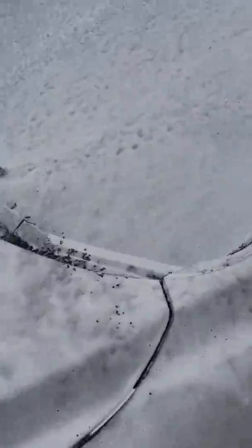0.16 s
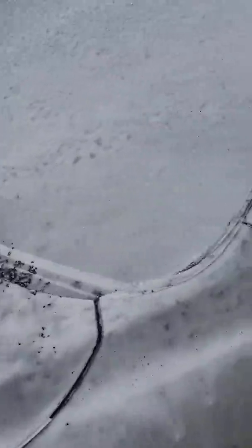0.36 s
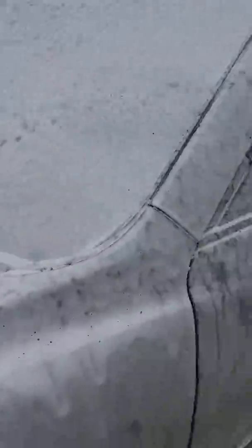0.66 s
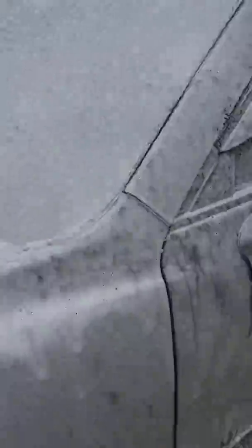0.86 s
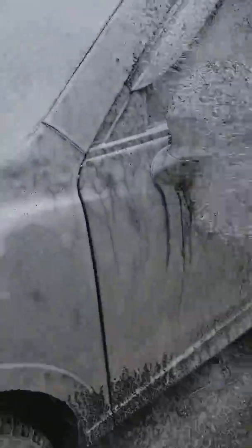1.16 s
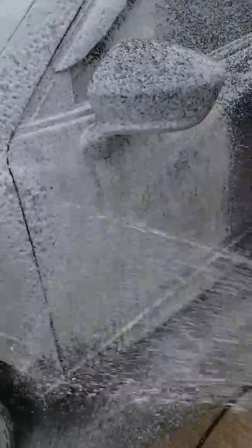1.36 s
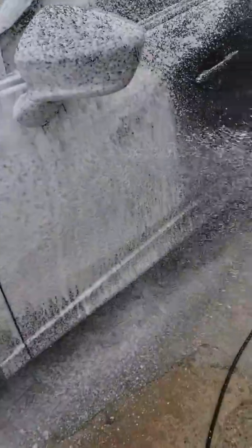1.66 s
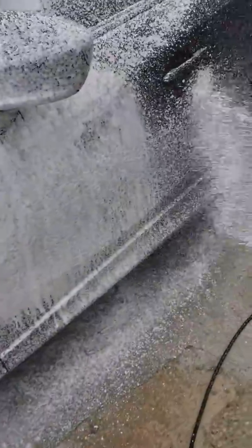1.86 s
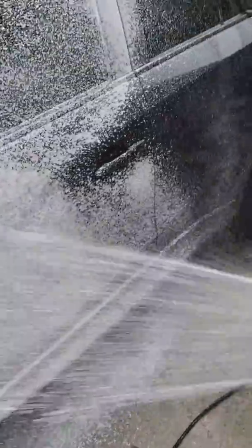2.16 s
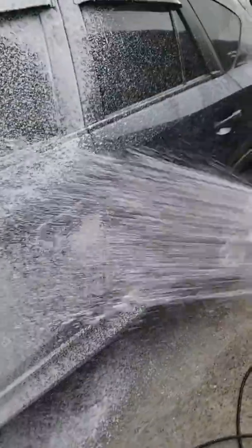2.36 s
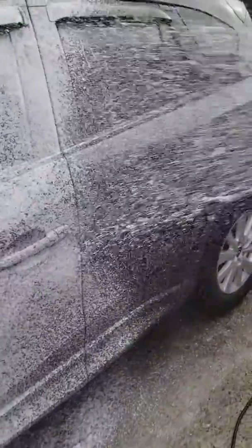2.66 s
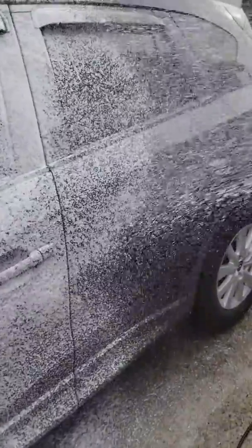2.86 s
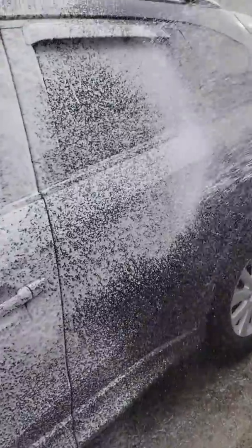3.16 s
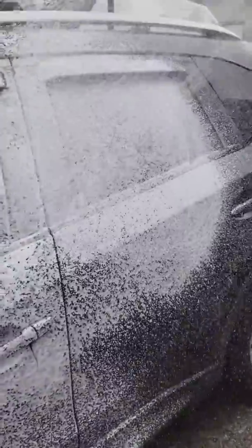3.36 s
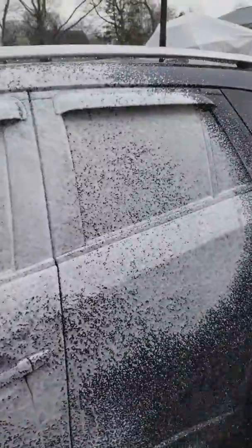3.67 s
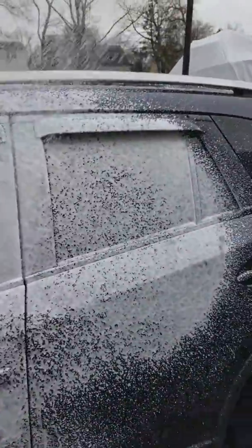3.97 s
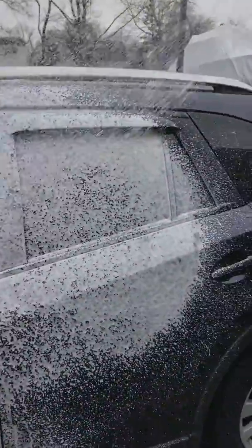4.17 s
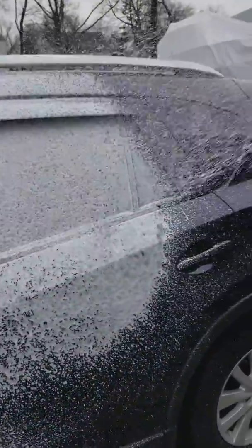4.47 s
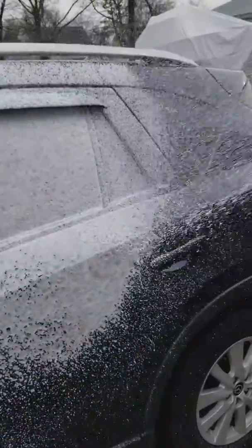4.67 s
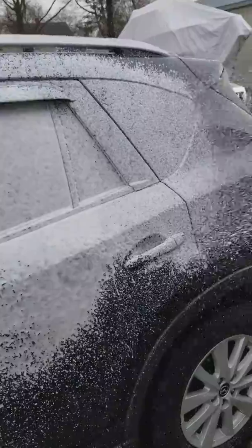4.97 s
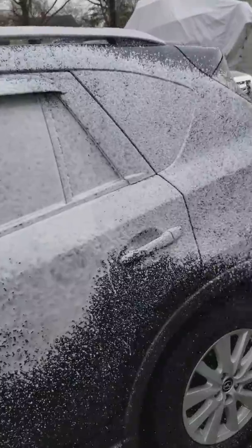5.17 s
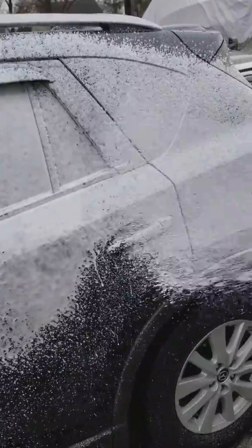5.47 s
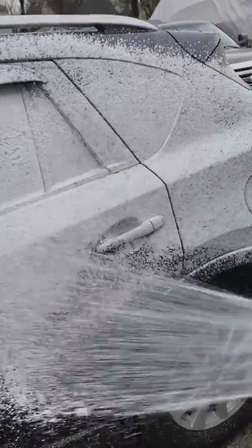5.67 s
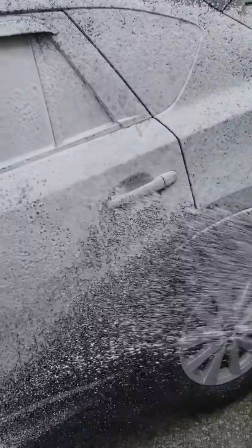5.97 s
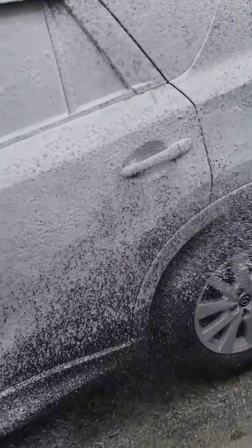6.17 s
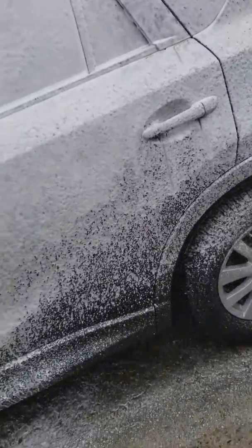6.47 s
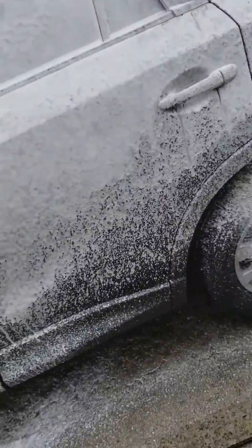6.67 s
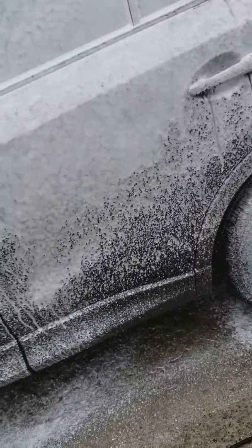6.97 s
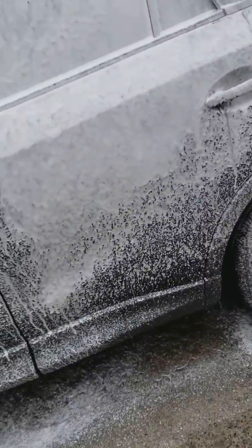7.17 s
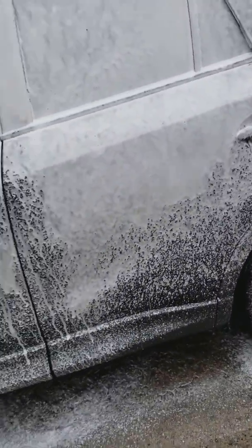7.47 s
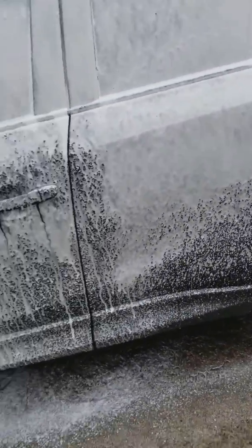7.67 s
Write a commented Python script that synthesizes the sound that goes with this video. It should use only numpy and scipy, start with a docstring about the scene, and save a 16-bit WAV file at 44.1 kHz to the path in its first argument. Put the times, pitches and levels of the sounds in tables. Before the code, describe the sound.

An electric pressure washer runs throughout, with a steady midrange hum, buzzing pump tones and a wavering thin high whine. In front, a foam jet roars and hisses in fluttering gusts, softly drumming on car panels as it sweeps. A very faint distant engine changes pitch under low outdoor rumble, nearly buried. Near stereo microphones in open air; a single water drop ticks at the left, and the spray never stops.

```python
"""An electric pressure washer runs outdoors while its foam lance sweeps along the side of a car.
Air sucked into the nozzle roars: bursty noise rings a set of broad resonances. Foam drums on the panels,
hisses and spatters: shaped noise that flickers. The motor, gear and three-piston pump hum and whine:
sine waves locked to the rotor. Far off, an engine's changing note sounds over low outdoor rumble.
One sharp drop ticks close to the left microphone."""
import sys
import numpy as np
from scipy import signal
from scipy.fft import rfft, irfft
from scipy.io import wavfile
from scipy.ndimage import map_coordinates

SR = 44100
rng = np.random.default_rng(int(sys.argv[2]) if len(sys.argv) > 2 else 0)


def put_to_file(sound):
    """Save the sound as 16-bit audio at rate SR, in the file named by the first command-line argument."""
    columns = np.atleast_2d(sound).T  # one column per channel
    safe = np.clip(columns, -1, 1)
    whole_steps = np.round(safe * 32767)
    wavfile.write(sys.argv[1], SR, whole_steps.astype(np.int16))


N = 345303   # length in samples
SIDES = np.array([[.5], [-.5]])   # shares a left-right difference between left and right


def from_db(db):
    """Turn decibels into a gain."""
    return 10 ** (np.asarray(db) / 20)


def rms_one(x):
    """Scale to an rms level of 1."""
    return x / np.sqrt(np.mean(x ** 2) + 1e-20)


def in_time(rows):
    """Join the points of a curve table by straight lines, one value per sample for each column."""
    s, *columns = np.transpose(rows)
    return [np.interp(np.arange(N) / SR, s, c) for c in columns]


def drift(rate_hz):
    """Slow random wandering with spread 1: noise smoothed twice by a one-pole low-pass."""
    step = 40   # samples from one coarse value to the next
    r = np.exp(-2 * np.pi * step * rate_hz / SR)
    coarse = rng.standard_normal(N // step + 4002)
    slow = signal.lfilter([1], [1, -2 * r, r * r], coarse)[4000:]   # skip the filter's start
    return np.interp(np.arange(N) / step, np.arange(len(slow)), rms_one(slow))


def pair(lag_ms, alike, own_above_hz=20):
    """Stereo noise: one share reaches both microphones, the left late by the lag; the rest is their own."""
    margin = 100   # spare samples at each end, room for the lag
    common = rng.standard_normal(N + 2 * margin)
    own = rng.standard_normal((2, N))
    own = signal.lfilter(*signal.butter(2, own_above_hz, "high", fs=SR), own)
    left = map_coordinates(common, [np.arange(N) + margin - lag_ms * SR / 1000], order=3)
    right = common[margin:N + margin]
    return np.sqrt(alike) * np.array([left, right]) + np.sqrt(1 - alike) * own


def coloured(white, spectrum, patchy_db, flicker_hz):
    """Shape noise to a spectrum, then let its half-octave bands flicker partly together; rms 1."""
    hz = np.arange(1, N // 2 + 2) * SR / N
    table_hz, table_db = np.transpose(spectrum)
    shape_db = np.interp(np.log(hz), np.log(table_hz), table_db, left=-60, right=-60)
    shaped = rfft(white) * from_db(shape_db)
    together = drift(flicker_hz)
    place = 2 * np.log2(hz / table_hz[0])   # pitch counted in half octaves
    out = 0
    for k in range(int(2 * np.log2(table_hz[-1] / table_hz[0])) + 2):
        # neighbouring bands overlap and fade into each other
        band = irfft(shaped * np.clip(1 - abs(place - k), 0, 1), N)
        out = out + band * from_db(patchy_db * (0.34 * together + 1.57 * drift(flicker_hz)))
    return rms_one(out)


def tone(turns, db, lead_turns, tilt_db=0):
    """A sine of the given rms level at both microphones, the left one leading in phase."""
    phase = 2 * np.pi * (turns + SIDES * lead_turns)
    return np.sqrt(2) * from_db(db + SIDES * tilt_db) * np.sin(phase)


def resonance(hz, width_hz):
    """Filter that rings at one pitch: a two-pole band-pass with gain 1 on top."""
    r = np.exp(-np.pi * width_hz / SR)
    b = (1 - r * r) / 2 * np.array([1, 0, -1])
    a = [1, -2 * r * np.cos(2 * np.pi * hz / SR), r * r]
    return b, a


# resonances of the nozzle's mixing chamber: (f/Hz, width/Hz, relative level/dB)
CHAMBER_RESONANCES = [(1855, 387, -6), (2082, 232, 3), (2289, 356, -2), (2620, 1640, -13.5),
                      (3060, 2150, -19), (3906, 520, -9.5), (5550, 2200, -27.5), (6780, 780, -2.5)]
# gulps of air in the nozzle: (t/s, level of the added turbulence/dB)
AIR_GULPS = [(1.2, 3), (1.214, 3.5), (1.2895, -4), (1.4245, -5), (1.947, -1), (2.323, 0), (3.5613, -6),
             (4.0032, 0), (5.604, 1), (5.6989, -6), (6.4418, -3)]
# the roar changes colour as the lance turns:
# (t/s, relative level of the top resonance/dB, lift of the upper shoulder/dB)
ROAR_COLOUR = [(0, -35, 5.5), (.3, -27, 2.5), (.65, -40, 5.5), (.95, -28, 1), (1.25, -25, 2),
               (1.75, -31.5, 3), (2.1, -27, -2), (2.35, -26, -1), (2.8, -32.5, 1.5), (3.2, -31, 2),
               (3.5, -22, 2), (3.75, -32, 3), (4.4, -37, 6.5), (5.15, -37, -1), (5.45, -25.5, -3),
               (5.7, -26.5, 3), (5.95, -33, 1), (6.15, -36, -0.5), (7.1, -39, -1), (7.6, -26.5, 2),
               (7.83, -27, -6)]


def nozzle(lag_ms, roar_db, tilt_db, gusts):
    """Air sucked into the jet: bursty turbulence and single gulps ring the mixing chamber's resonances."""
    bursts = from_db(1.76 * drift(126) + 0.39 * drift(6.5))
    puffs = pair(lag_ms, alike=0.81, own_above_hz=2150) * gusts * bursts
    gulp = np.hanning(round(.008 * SR))   # each lasts 8 ms
    for s, db in AIR_GULPS:
        at = round(s * SR)
        puffs[:, at:at + len(gulp)] *= 1 + gulp * from_db(db)
    top_db, shoulder_db = in_time(ROAR_COLOUR)
    shoulder, top = 3, 7   # rows of the resonance table
    out = 0
    for k, (hz, width_hz, db) in enumerate(CHAMBER_RESONANCES):
        level_db = top_db if k == top else roar_db + shoulder_db * (k == shoulder)
        # each swells by itself, so the roar's centre wanders
        level_db = level_db + 0.6 * drift(9.0)
        b, a = resonance(hz, width_hz)
        ringing = signal.lfilter(b, a, signal.lfilter(b, a, puffs))
        out = out + (-1) ** k * from_db(db + level_db) * ringing   # every other one is flipped
    # 15.5 dB of gain: the narrow resonances pass only a small part of the turbulence
    return out * from_db(15.5 + tilt_db * SIDES)


# colour of the drumming on sheet metal: (f/Hz, relative level per Hz/dB)
PANEL_SPECTRUM = [(150, -23), (230, -4.5), (400, 1.5), (900, 1.5), (1400, -6.5), (2000, -1), (3200, -61)]
# colour of the jet's hiss: (f/Hz, relative level per Hz/dB)
JET_SPECTRUM = [(1000, -8.5), (2500, -0.5), (3400, -6), (5200, -5.5), (6500, -3.5), (7600, -3),
                (8800, -12.5), (11000, -25)]
# colour of the fine spatter: (f/Hz, relative level per Hz/dB)
SPATTER_SPECTRUM = [(5000, -7), (8800, -6.5), (10500, -0.5), (12500, -1), (14000, -2.5), (16000, -5.5)]


def foam(lag_ms, panel_db, jet_db, spatter_db, tilt_db, gusts):
    """The fan of foam: a dull drumming on sheet metal, the jet's hiss and the wide, fine spatter."""
    panel_noise = pair(0.49 * lag_ms, alike=0.7)
    panels = coloured(panel_noise, PANEL_SPECTRUM, patchy_db=0.5, flicker_hz=1.5)
    panels = panels * from_db(panel_db)

    jet_noise = pair(lag_ms, alike=0.47, own_above_hz=4200)
    jet = coloured(jet_noise, JET_SPECTRUM, patchy_db=2.0, flicker_hz=83)
    jet = jet * from_db(jet_db + 1.0 * drift(3.1))
    jet = jet * from_db((0.64 * tilt_db + 1.0) * SIDES)

    spatter_noise = pair(lag_ms, alike=0.22)
    spatter = coloured(spatter_noise, SPATTER_SPECTRUM, patchy_db=0.7, flicker_hz=80)
    spatter = spatter * from_db(spatter_db + 0.71 * drift(3.9))
    spatter = spatter * from_db(-0.6 * SIDES)   # slightly louder on the right
    return panels + gusts * (jet + spatter)


# an echo changes the level of one steady tone for a while, mostly cancelling it:
# (f/Hz, middle t/s, half length/s, depth/dB); a negative depth lifts the tone
ECHO_FADES = [(221, 4, 0.89, 7), (221, -1.5, 0.24, 2), (369, 3, 0.53, 12), (369, 6, 1, 10),
              (443, 2, 0.77, 17), (443, 3.5, 0.57, 2.5), (443, 6, 1.1, 4), (664, 0.06, 0.74, 8.5),
              (664, 2.36, 0.57, 28), (664, 0.5, 0.15, 8), (664, 2.5, .2, 3), (664, 3.5, 0.68, 10),
              (443, 2, .25, 5), (885, 3, .2, 3), (664, 5, .6, 7.5), (885, 1.77, 0.81, 10.5),
              (885, 4.5, 0.93, 7.5), (885, 6.5, 0.71, 26), (1107, 2, 1.03, 19), (1107, 6, 0.77, -1),
              (1181, 1.4, 0.54, 20), (4697, 1.5, 1.2, 14), (5030, 13, .4, 2), (5030, 2.5, 1, 14),
              (5030, 5, 0.62, -1), (5755, 3, 3, 10)]


def faded_db(hz):
    """Level change over time of the tone at this pitch, where an echo adds to it or cancels it."""
    t = np.arange(N) / SR
    loss_db = np.zeros(N)
    for line_hz, s, half_s, depth_db in ECHO_FADES:
        if abs(line_hz / hz - 1) < .03:   # the fade belongs to this tone
            loss_db += depth_db * np.exp(-abs((t - s) / half_s) ** 3)
    return -loss_db


# turning speed of the rotor: (t/s, f/Hz)
ROTOR_SPEED = [(0, 335.2), (.95, 334.96), (2.1, 335.36), (4.2, 335.36), (5.6, 335.88), (7.0, 335.8),
               (7.55, 335.36), (7.83, 335.35)]
# the rotor's hum as the listener walks: (t/s, level/dB, lead of the left microphone/ms)
HUM_PATH = [(0, -30.5, -0.012), (.25, -29.5, -0.08), (.52, -28.7, -0.083), (.7, -26.5, -0.14),
            (.95, -24.5, -0.13), (1.15, -26, -0.067), (1.4, -30.5, 0.082), (1.8, -30, 0.027),
            (2.35, -34.5, -0.059), (3.1, -30.5, -0.17), (3.7, -29.5, -.29), (4.05, -29.5, -0.3),
            (4.5, -31, -0.3), (5.0, -29.2, -0.24), (5.25, -27.5, -0.18), (5.6, -28, -0.19),
            (6.4, -28.8, -0.13), (6.95, -28, -0.097), (7.35, -26, -0.15), (7.83, -26.5, -0.17)]
# the gear whine swells and shifts between the microphones as the listener walks:
# (t/s, mesh level/dB, left-right/dB, left lead/cycles, octave level/dB, left-right/dB, left lead/cycles)
GEAR_MESH = [(0.0, -32.0, 5, -0.09, -37, 3.6, -1), (0.2, -39.0, 5.9, -0.43, -35.4, -1.6, 0.2),
             (0.4, -38.5, 7, 0.16, -34.4, -4.4, -0.5), (0.6, -32, -3.2, 0.33, -30, -0.8, 1.2),
             (0.8, -31, -3.5, -0.078, -34.3, 0, 0.3), (1.0, -34.5, 3, -0.086, -33, -3.1, 0.7),
             (1.2, -29.5, 2.9, 0.31, -30, -0.4, -0.01), (1.41, -37.5, -1.2, 0.92, -39, 2.1, 1.5),
             (1.61, -41.8, 3.2, 0.46, -34, -7.0, 0.15), (1.81, -35, 2.5, 0.33, -36.6, -4, 1.4),
             (2.01, -43, 4.2, 0.48, -30, 0.5, 0.29), (2.21, -37.7, -2.2, 0.55, -41, -2.2, 1),
             (2.41, -40, -0.1, -0.18, -29.5, -2.1, -0.3), (2.61, -36, 1.5, 0.73, -33, -2, -0.46),
             (2.81, -31.5, -1, 0.94, -34, -3.8, -0.9), (3.01, -32.5, -0.4, 1.7, -32, -6.4, -1.5),
             (3.21, -30.5, 1.8, 1.8, -36, 0, -2), (3.41, -34, 0.0, 1.5, -33.6, -3.7, -2.5),
             (3.61, -34.8, -3, 1.73, -34.7, 3, -2), (3.81, -30, -6, 1.47, -42, -2, -2.5),
             (4.02, -32.5, -1.3, 1.23, -38, -1, -3), (4.22, -27.5, -1.4, 1.27, -34.0, -0.9, -4),
             (4.42, -30.5, -3.5, 1.33, -39, 2, -3), (4.62, -31, 4, 1.44, -31.7, 1, -3),
             (4.82, -28.6, -2.3, 1.32, -30, 2, -3), (5.02, -30, -3.0, 1.32, -32, -1.5, -4.5),
             (5.22, -29, 3.5, 1.52, -34, 1, -2.5), (5.42, -31, 4, 1.52, -33, -3.6, -6),
             (5.62, -35.0, -7, 1.17, -32.8, -3.1, -3), (5.82, -38.9, -9, 1.61, -31.5, -0.2, -4.06),
             (6.02, -39, -1.3, 1.4, -33, -2.8, -6.5), (6.22, -35.5, 0.4, 1.68, -33.7, -0.6, -4.5),
             (6.42, -30, -1.3, 1.88, -35, -1.1, -5.53), (6.63, -30.7, -3.8, 1.9, -32.5, -1.5, -5),
             (6.83, -35.5, -3.8, 2, -31, -4.1, -5), (7.03, -30, -4, 1.8, -32.5, -3, -5),
             (7.23, -32.5, -6, 1.72, -34.5, -6.7, -3.5), (7.43, -33.9, -5, 1.74, -37, -3.8, -3.5),
             (7.63, -33, -2.7, 1.5, -31.7, 1.8, -4.09), (7.83, -28, -1.8, 1.3, -29, 2.3, -2.5)]
# faint rotor whistles: (multiple of the rotor rate, level/dB)
ROTOR_WHISTLES = [(14, -45.5), (15, -44)]
# strong pump tones, three strokes a turn:
# (multiple of the pump shaft rate, rounded when played, level/dB, share of the hum's lead time)
PUMP_STRONG_TONES = [(2, -62.5, 0.97), (3, -47, 0.99), (5, -42, 0.97), (6, -38.5, 0.77), (9, -40, .2),
                     (12, -39, 0.26), (15, -45, 0.98), (16, -46.5, 1), (78.4, -44, 0.61)]
# weak pump tones; those beside 50 and 100 are mesh sidebands: (multiple of the pump shaft rate, level/dB)
PUMP_WEAK_TONES = [(4, -52), (8, -56), (10, -52), (11, -55), (13, -52), (14, -49), (17, -56), (18, -53),
                   (19, -49), (20, -51), (21, -53), (22, -55), (49, -51), (51, -50), (52, -51), (56, -50),
                   (58, -54), (62, -53), (64, -51), (65, -53), (79, -53), (99, -49), (101, -50)]
# weak rotor tones; fractions combine rotor and pump shaft rates: (multiple of the rotor rate, level/dB)
ROTOR_WEAK_TONES = [(.78, -56), (1.22, -80), (1.44, -55.5), (1.66, -51), (2, -60), (3, -50.5), (4, -63)]


def washer():
    """Motor, gear and pump: hum, tooth mesh and pump tones all follow the rotor; one extra tone is steady."""
    pinion_teeth, wheel_teeth = 11, 50
    ratio = pinion_teeth / wheel_teeth   # pump shaft turns per rotor turn
    rotor_hz, = in_time(ROTOR_SPEED)
    mean_hz = rotor_hz.mean()
    rotor = np.cumsum(rotor_hz * (1 + .0003 * drift(6))) / SR   # turns so far
    hum_db, lead_ms = in_time(HUM_PATH)
    lead = lead_ms * rotor_hz / 1000   # in rotor turns
    out = tone(rotor, hum_db, lead, tilt_db=-1)

    mesh_db, mesh_tilt_db, mesh_lead, octave_db, octave_tilt_db, octave_lead = in_time(GEAR_MESH)
    out += tone(pinion_teeth * rotor, mesh_db + 1.5 * drift(40), mesh_lead, mesh_tilt_db)
    octave_lead = octave_lead + 0.068 * drift(8)
    out += tone(2 * pinion_teeth * rotor, octave_db + 1.6 * drift(21), octave_lead, octave_tilt_db)

    for multiple, db in ROTOR_WHISTLES:
        multiple = round(multiple)
        level_db = db + faded_db(multiple * mean_hz) + 3 * drift(6)
        out += tone(multiple * rotor, level_db, .3 + .15 * drift(2))

    for multiple, db, share in PUMP_STRONG_TONES:
        multiple = round(multiple) * ratio
        level_db = db + faded_db(multiple * mean_hz)
        turns = multiple * rotor + rng.random()
        out += tone(turns, level_db, share * multiple * lead, 1.3 * drift(0.96))

    weak = [(round(multiple) * ratio, db) for multiple, db in PUMP_WEAK_TONES]
    # whole steps of one wheel tooth per rotor turn
    weak += [(round(multiple * wheel_teeth) / wheel_teeth, db) for multiple, db in ROTOR_WEAK_TONES]
    for multiple, db in weak:
        # echoes off car and ground make each weak tone swell and shift between the ears by itself
        wander = lead + 0.047 * drift(0.6)
        out += tone(multiple * rotor + rng.random(), db + 2 * drift(.5), multiple * wander)

    mains_hz = 239.6   # the mains tone, free of the rotor
    return out + tone(mains_hz * np.arange(N) / SR, -56.5 + 1.6 * drift(0.37), 0)


# firing note of the distant engine: (t/s, f/Hz, level/dB)
ENGINE_NOTE = [(0, 90.3, -65), (.35, 91.5, -64), (.45, 78.7, -71), (.64, 79, -60), (.9, 81.5, -56),
               (1.3, 85, -56), (1.68, 87.7, -63), (2.12, 97, -66.5), (2.81, 105.3, -63), (3.3, 110, -89),
               (6.9, 81, -85), (7.1, 80, -71), (7.4, 81.6, -70), (7.83, 83.4, -59)]
# colour of the low outdoor rumble: (f/Hz, relative level per Hz/dB)
RUMBLE_SPECTRUM = [(20, -8), (35, -1), (50, -5), (80, -5.5), (115, -3), (180, 3), (300, 1)]


def street():
    """A far engine's firing note, a wavering sine, over low outdoor rumble made of shaped noise."""
    hz, db = in_time(ENGINE_NOTE)
    firing = np.cumsum(hz * (1 + 0.011 * drift(4.2))) / SR
    engine = tone(firing, db + 2.3 * drift(10.0), 0)
    rumble = coloured(pair(0, alike=.97), RUMBLE_SPECTRUM, patchy_db=.5, flicker_hz=3)
    return engine + from_db(-58) * rumble


def drop():
    """One drop bursts close to the left microphone: a sharp tick three samples long."""
    drop_s, peak_db = 3.501, -3
    out = np.zeros((2, N))
    at = round(drop_s * SR)
    out[0, at:at + 3] = -from_db(peak_db) * np.array([-.4, 1, .6])
    return out


# where the lance points, as heard by two spaced microphones: (t/s, left lag/ms, left-right/dB)
LANCE_DIRECTION = [(0, -0.5, -1), (.2, -.5, 1), (.6, -0.38, .5), (.85, -0.3, 0), (1.15, -0.13, 0),
                   (1.33, 0.051, -2), (1.6, -0.014, -1), (1.87, -0.098, -1.5), (2.16, .04, -1),
                   (2.35, -0.035, -2), (2.7, -.195, -1), (2.95, -0.2, -2.5), (3.25, -0.32, -0.5),
                   (3.62, -0.49, 2), (4.15, -0.36, 0), (4.73, -0.26, -1.5), (4.87, -.2, -2),
                   (5.1, -0.17, -0.5), (5.4, -0.17, -1.5), (5.8, 0.092, -2.5), (5.97, .005, -1.5),
                   (6.25, -0.09, -.5), (6.48, 0.029, -.5), (6.7, 0.03, -1), (6.85, 0.08, -1.5),
                   (7.15, -0.051, 0), (7.35, -0.095, -.5), (7.65, -0.11, -1.5), (7.83, -0.085, -1.2)]
# loudness of the spray as the lance swings near and away, each a relative level:
# (t/s, nozzle roar level/dB, panel drumming level/dB, jet hiss level/dB, fine spatter level/dB)
SPRAY_LOUDNESS = [(0, -24.5, -37.5, -23.5, -28), (.7, -25, -37, -29.5, -30), (.95, -21.5, -35, -24, -30),
                  (1.08, -18.5, -32.5, -25.5, -24.5), (1.24, -18, -32, -22.5, -21.5),
                  (1.42, -23, -34, -24.5, -22), (1.55, -23.5, -36, -26.5, -33),
                  (1.8, -23.5, -36, -29.5, -35), (1.95, -21, -35, -28, -31.5),
                  (2.1, -15.5, -32, -25, -26.5), (2.22, -19, -33, -22.5, -26.5), (2.35, -19, -33, -25, -30),
                  (2.52, -20, -32, -23.5, -26.5), (2.64, -20, -34.5, -27, -29),
                  (2.78, -20, -35, -26.5, -30), (3.15, -23.5, -35, -26, -28),
                  (3.45, -18, -34, -24.5, -23.5), (3.7, -17.5, -37.5, -23.5, -24.5),
                  (4.1, -20.5, -37, -24.5, -27), (4.3, -21.5, -36.5, -26.5, -27),
                  (4.55, -23, -37, -28, -26.5), (4.85, -19.5, -37, -26, -23), (5.1, -23, -36.5, -27.5, -25),
                  (5.4, -18.5, -35, -26.5, -27.5), (5.6, -20.5, -29.5, -23.5, -27),
                  (5.68, -19, -32, -23.5, -28.5), (5.78, -19.5, -31.5, -24, -28.5),
                  (5.9, -20.5, -34.5, -23.5, -28.5), (6.1, -24, -37, -27.5, -25),
                  (6.3, -25, -36.5, -24, -26), (6.44, -24, -37.5, -30, -26.5),
                  (6.55, -26, -36, -27.5, -30.5), (6.75, -24, -39, -25, -24.5),
                  (7.0, -26, -35.5, -26.5, -30.5), (7.35, -23, -35.5, -23.5, -26.5),
                  (7.6, -21.5, -35.5, -24, -31.5), (7.83, -18.5, -32, -23, -28)]


def scene():
    """Lance, machine, street and drop; the uneven air-water mix shakes roar, hiss and spatter together."""
    lag_ms, tilt_db = in_time(LANCE_DIRECTION)
    roar_db, panel_db, jet_db, spatter_db = in_time(SPRAY_LOUDNESS)
    gusts = from_db(0.29 * drift(140) ** 2)   # squared, so gusts only ever add
    roar = nozzle(lag_ms, roar_db, tilt_db, gusts)
    spray = roar + foam(lag_ms, panel_db, jet_db, spatter_db, tilt_db, gusts)
    return spray + washer() + street() + drop()


# the right microphone's port resonance: (f/Hz, width/Hz, lift/dB)
RIGHT_PORT_RESONANCE = (6450, 1130, 3.5)


def record(dry):
    """The right port lifts a treble band, the highest peaks are rounded, the top is cut."""
    hz, width_hz, lift_db = RIGHT_PORT_RESONANCE
    ringing = signal.lfilter(*resonance(hz, width_hz), dry[1])
    lifted = dry[1] + (from_db(lift_db) - 1) * ringing
    picked = np.array([dry[0], lifted])
    rounded = picked / (1 + abs(picked) ** 6) ** (1 / 6)
    top_cut = signal.ellip(14, .3, 85, 15800, fs=SR, output="sos")   # steep cut above 15800 Hz
    return signal.sosfilt(top_cut, rounded)


dry = scene()
out = record(dry)
put_to_file(out)
```